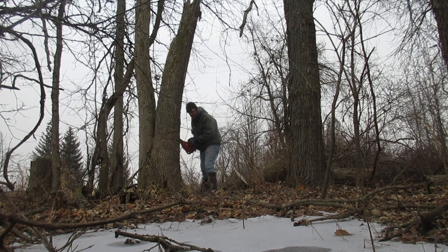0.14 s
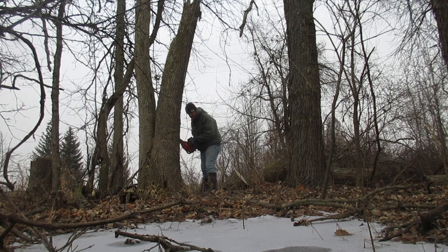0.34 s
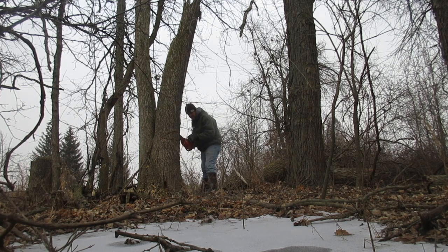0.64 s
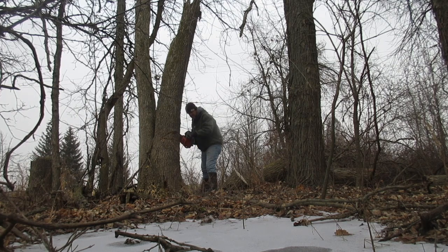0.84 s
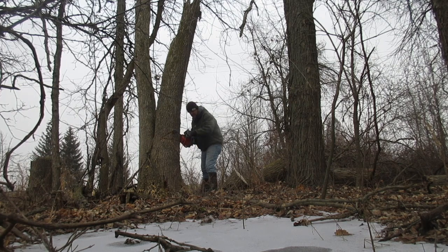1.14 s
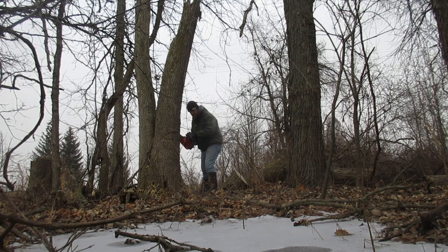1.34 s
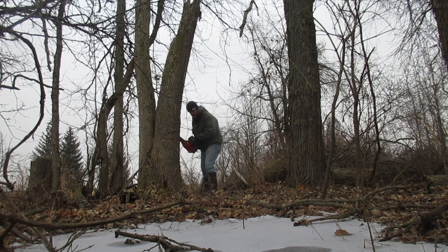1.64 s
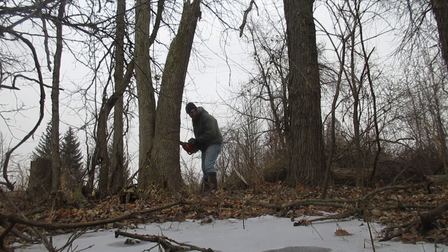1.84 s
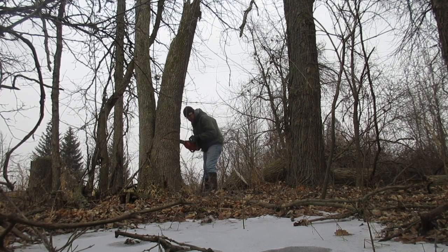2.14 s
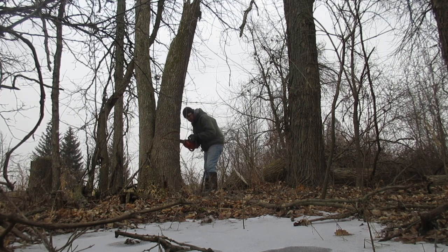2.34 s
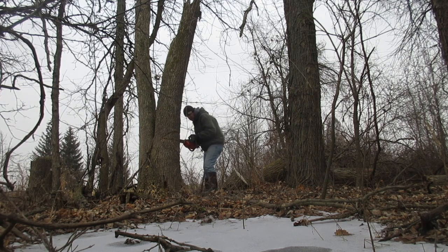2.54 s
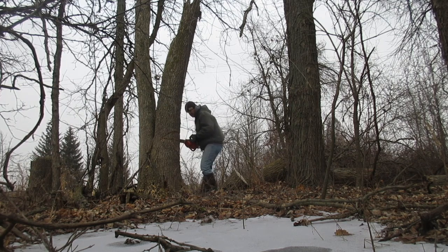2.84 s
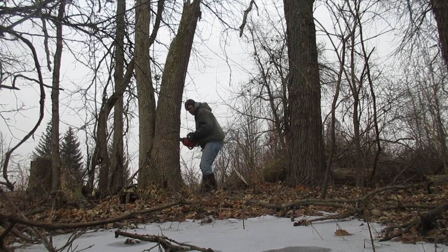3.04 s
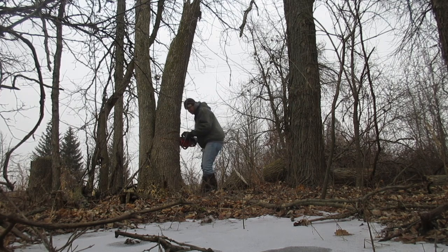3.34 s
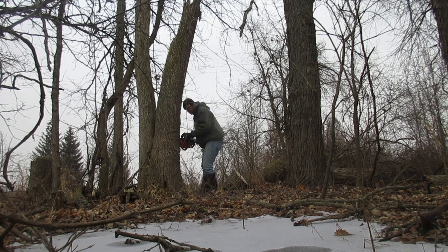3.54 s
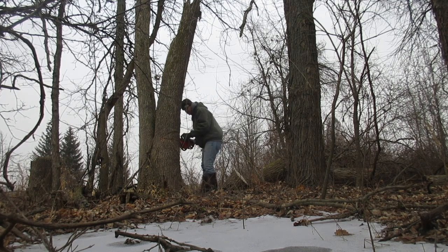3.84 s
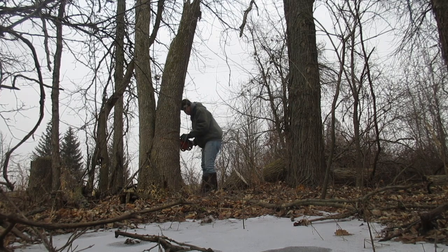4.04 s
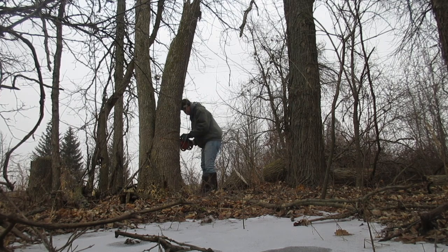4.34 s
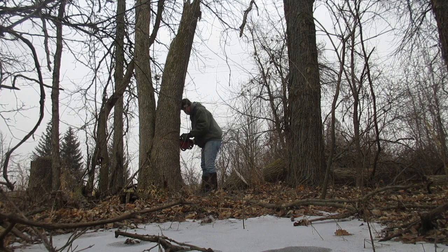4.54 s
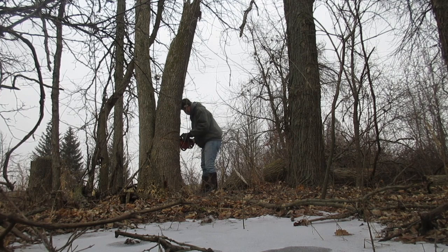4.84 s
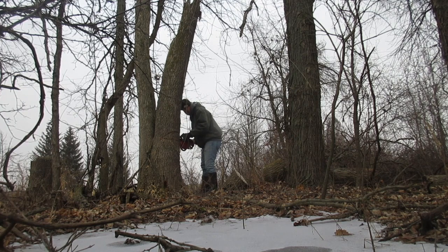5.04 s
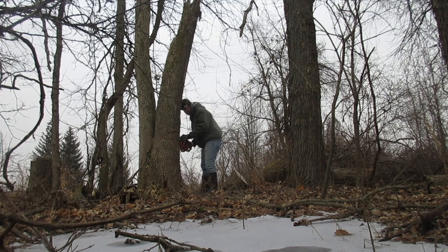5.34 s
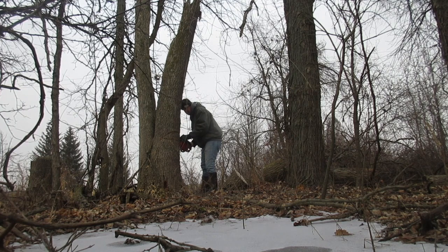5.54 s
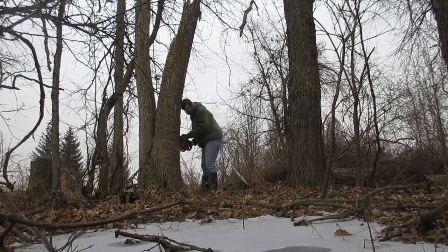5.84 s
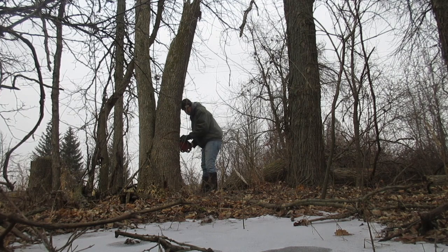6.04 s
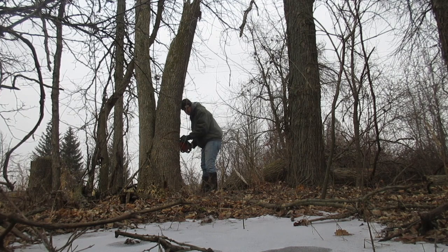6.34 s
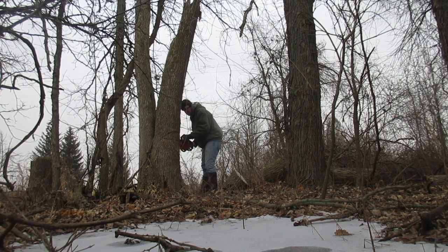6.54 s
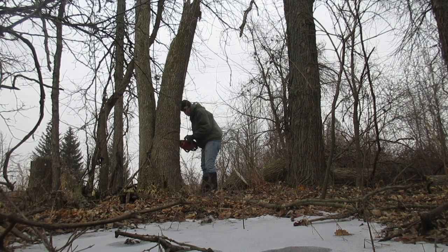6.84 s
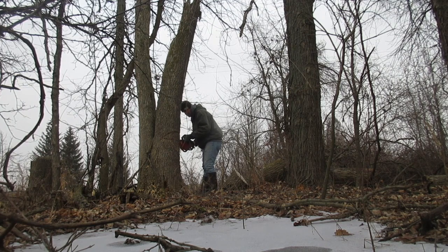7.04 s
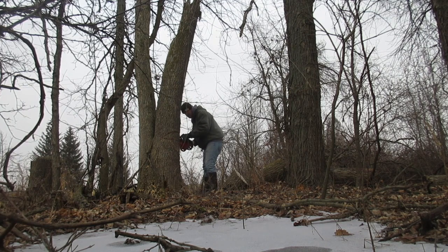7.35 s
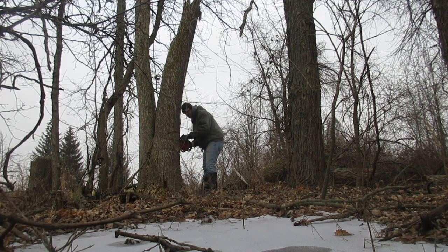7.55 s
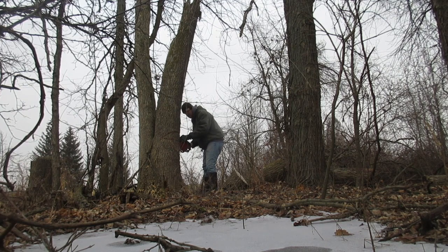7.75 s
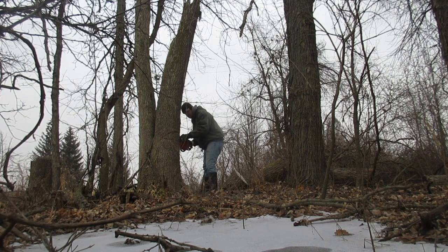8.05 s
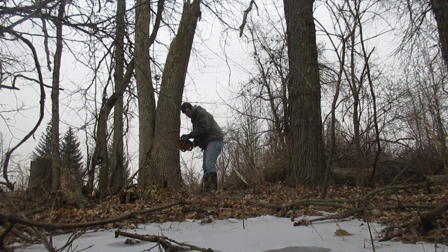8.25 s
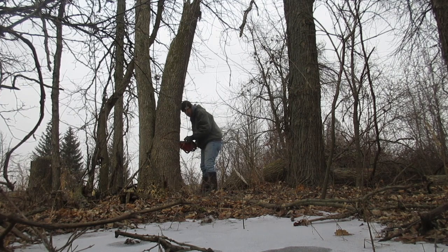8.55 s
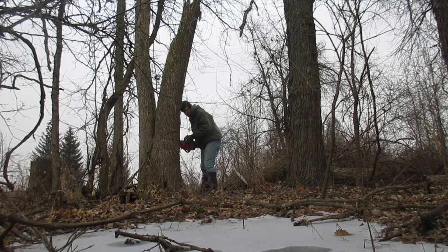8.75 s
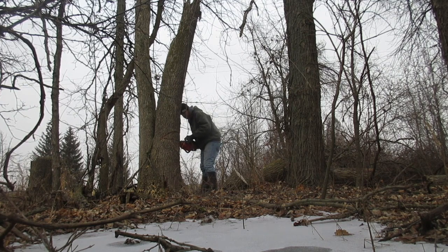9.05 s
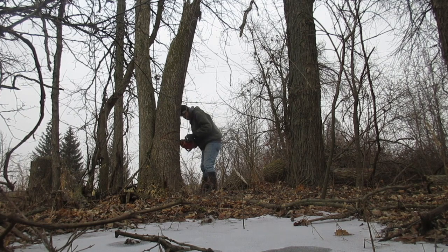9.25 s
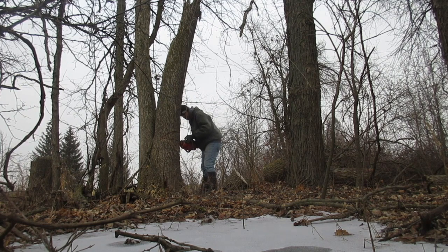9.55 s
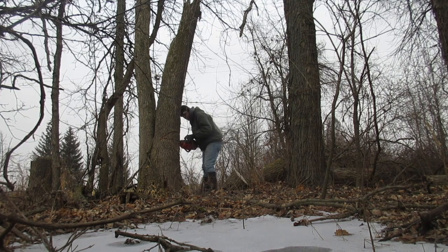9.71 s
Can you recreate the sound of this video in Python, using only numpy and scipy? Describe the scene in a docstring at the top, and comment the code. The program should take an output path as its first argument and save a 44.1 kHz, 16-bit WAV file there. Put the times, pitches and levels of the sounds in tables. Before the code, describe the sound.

A small battery chainsaw works on a tree trunk outdoors, heard in mono from some metres away, with faint tree echoes over soft, steady distant rumble and hiss. It is already running at 0 s and winds down by 0.3 s. Clacks lead into a short buzzing rev from 0.7 to 1.15 s. Leaves and bark rustle and tick until about 1.9 s, with a tiny squeak, then near quiet. Clacks at 2.9 s start a long cut from 3.0 to 5.85 s: raspy whine, sagging to a rough, low growl around 4.5-5.1 s, climbing again, then stopping. A faint squeak and light rustles follow at 6.1-6.7 s. Clacks start the last cut, 6.8-8.05 s, bright and steady with a brief dip, then slowing away. Rustling and ticks come at 8.3-8.7 s, a loud sharp twig snap at 8.8 s, faint ticks, and a weaker, duller snap near 9.6 s.

```python
"""Small chainsaw in a winter wood

A small battery chainsaw cuts a trunk in four bursts, some metres from a mono microphone.
Link blows in a pattern of four gate friction noise; beat, shaft and gears add tones. All slow as the chain bites.
Noise bursts make clacks, bites and idle-chain ticks on bark; leaves rustle and twigs snap in the pauses.
Tree echoes blur the near sounds over a faint steady background."""
import sys
import numpy as np
from scipy import signal
from scipy.fft import rfft, irfft, next_fast_len
from scipy.io import wavfile
from scipy.ndimage import uniform_filter1d, map_coordinates

SR = 44100
rng = np.random.default_rng(int(sys.argv[2]) if len(sys.argv) > 2 else 0)


def put_to_file(sound):
    """Save the sound as 16-bit audio at rate SR, in the file named by the first command-line argument."""
    columns = np.atleast_2d(sound).T  # one column per channel
    safe = np.clip(columns, -1, 1)
    whole_steps = np.round(safe * 32767)
    wavfile.write(sys.argv[1], SR, whole_steps.astype(np.int16))


N = 435708
TIME = np.arange(N) / SR
TOP_HZ = 15050  # band limit


def amp(db):
    """Amplitude ratio from dB."""
    return 10 ** (np.asarray(db) / 20)


def unit(x):
    """x at unit RMS."""
    return x / np.sqrt(np.mean(x ** 2) + 1e-20)


def along(points, hz):
    """Interpolates (f/Hz, value) points on a log frequency axis."""
    f, v = np.transpose(points)
    return np.interp(np.log(hz + 1), np.log(f + 1), v)


def curves(tables):
    """A gate open inside the tables, then one value per sample for each column."""
    s, *cols = np.concatenate(tables).T
    inside = sum((TIME >= t[0][0]) & (TIME <= t[-1][0]) for t in tables)
    gate = uniform_filter1d(inside * 1., size=600)
    return [gate] + [np.interp(TIME, s, c) for c in cols]


def wobble(rate_hz):
    """A smooth random curve with rate_hz knots a second."""
    coarse = TIME[::16]
    knots = rng.standard_normal(int(N * rate_hz / SR) + 4)
    return np.interp(TIME, coarse, map_coordinates(knots, [coarse * rate_hz]))


def spell(start_s, end_s, fade_s):
    """A gate that opens smoothly around start_s and shuts around end_s."""
    edge = np.minimum(TIME - start_s, end_s - TIME) / fade_s
    return np.clip(edge + .5, 0, 1) ** 2


def coloured(x, points):
    """Filters x with a minimum-phase response of unit power and the given spectrum."""
    response = amp(along(points, np.fft.rfftfreq(8192, 1 / SR)))
    cepstrum = irfft(np.log(np.maximum(response, 1e-4)))
    # fold to the causal side
    cepstrum[1:4096] *= 2
    cepstrum[4097:] = 0
    h = irfft(np.exp(rfft(cepstrum)))[:4096]
    return signal.fftconvolve(x, h / np.linalg.norm(h))[:len(x)]


# chips and cooling air; also treble of all contacts [f/Hz, density/dB]
HISS_SPECTRUM = [(2350, -31), (4000, -5), (4300, -9), (4850, -3), (6010, -5), (6240, 1), (6930, -4.5),
                 (7780, -2), (9020, -5.5), (9850, -7.5), (10800, -7), (13100, -12), (14900, -20)]


def three_bands(drive, low_db, high_db, low, middle):
    """One excitation per band, heard through a low, a middle and a treble colour."""
    treble = amp(high_db) * coloured(drive[2], HISS_SPECTRUM)
    return amp(low_db) * coloured(drive[0], low) + coloured(drive[1], middle) + treble


# four bursts, first already running, each slowing until it falls silent
# [t/s, cutter-pair rate f/Hz, chain level/dB]
DRIVE = [
    [(0, 299, -19.5), (.09, 298.6, -19.5), (.185, 172.4, -23.5), (.25, 120.7, -25.5), (.295, 66.7, -58)],
    [(.69, 72.9, -40), (.74, 120, -24.5), (.79, 155.5, -18), (.86, 262.3, -16), (.9, 295.5, -16.5),
     (.97, 282.6, -18.5), (1.04, 290.6, -19.5), (1.1, 232.3, -27.5), (1.14, 150.5, -36), (1.17, 90, -75)],
    [(2.96, 56.53, -34), (3.05, 127.9, -17.5), (3.14, 251.2, -16), (3.19, 267, -18), (3.283, 274.2, -18),
     (3.317, 297, -17), (3.46, 282.8, -18), (3.53, 299.6, -17.5), (3.68, 234.6, -20), (3.79, 224.5, -19.5),
     (3.87, 242.5, -18.5), (3.96, 239.8, -19.5), (4.1, 248, -18), (4.18, 195, -17.5), (4.235, 236.4, -18),
     (4.35, 255.2, -18.5), (4.43, 219.7, -15), (4.55, 133.5, -19.5), (4.61, 163, -18.5), (4.69, 177, -17.5),
     (4.765, 160.5, -20), (4.83, 114, -23), (4.88, 113.1, -20), (4.96, 139.2, -20.5), (5.044, 134.7, -18),
     (5.15, 199.5, -17.5), (5.263, 244, -16.5), (5.4, 248.7, -16), (5.453, 216.4, -16.5),
     (5.55, 261.8, -19.5), (5.67, 269, -17.5), (5.76, 215, -17), (5.81, 140.5, -24), (5.85, 100.1, -64)],
    [(6.82, 64, -33.5), (6.88, 110.2, -23), (6.92, 152.4, -15.5), (6.995, 250, -17), (7.03, 255.6, -16.5),
     (7.125, 264.8, -15.5), (7.17, 294, -16.5), (7.313, 285.6, -18), (7.36, 204, -19.5), (7.4, 199.1, -19),
     (7.46, 243.9, -19.5), (7.58, 271.7, -16), (7.78, 271.6, -17), (7.88, 251.4, -18.5),
     (7.95, 175.7, -19.5), (8.02, 135.3, -21), (8.04, 110, -41), (8.07, 75, -52)],
]
# mean blow of left cutter, tie, right cutter, tie [relative force]
LINKS = [0.58, 0.43, 0.27, 0.88]
# wood and housing [f/Hz, density/dB]
GROWL_SPECTRUM = [(88, -58), (150, -25.5), (301, -1.5), (425, -7), (553, -1.5), (687, -5), (900, -23.5),
                  (1170, -15), (1980, -120)]
# chain on bar [f/Hz, density/dB]
BAR_SPECTRUM = [(410, -20.5), (720, -20), (830, -3.5), (930, -9), (1170, -3.5), (1300, -7.5), (1590, -7.5),
                (1760, -7), (2300, -4), (2890, 2.5), (3200, -4.5), (3720, -4.5), (4090, -17), (4600, -14),
                (5980, -12), (10100, -120)]
# cutter beat, motor shaft (1.36), links [multiple of pair rate, relative level/dB]
CHAIN_TONES = [(1, -4), (1.36, -2), (2, -1), (3, -8), (8, -6)]
# tooth mesh and overtones [multiple of pair rate, relative level/dB]
GEAR_TONES = [(11, -12), (22, -18), (33, -13), (44, -19), (55, -30)]
# how well chain and gear tones carry [f/Hz, gain/dB]
SHELL_GAIN = [(150, -40), (225, -12), (310, 4), (400, -3), (520, 2), (900, 0), (1150, 5), (1500, -3),
              (2200, -8), (2950, 3), (4500, -13), (5600, -5), (6300, 3), (7100, -4), (8000, 1), (8900, 1),
              (9600, -9), (11500, -15), (15000, -14)]
# link beat ringing the bar [multiple of pair rate, relative level/dB]
LINK_TONES = [(4, -6), (6, -9), (9, -10), (10, -9), (12, -9)]
# bar response to that beat [f/Hz, gain/dB]
BAR_RING = [(600, -21), (760, -9), (920, -0.5), (1050, -1), (1180, 1.5), (1350, -10), (1620, -4.5),
            (1900, -27), (2500, 3), (2950, 0.5), (3500, -4)]
# how freely the bar rings, one entry per burst [gain/dB]
RING_DB = [2.5, 0.5, -1, 1]
# hiss re chain at the easy rate, one entry per burst [level/dB]
HISS_DB = [-2, -2.5, -5, -5.5]
FREE_HZ = 280  # pair rate of an easy cut
GROWL_DB, GROWL_DB_PER_HZ = -17, 0.0492  # re chain at the easy rate; gain as it slows
HISS_LOSS_DB_PER_HZ = 0.027  # loss as it slows
BOG_HZ, BOG_SPAN_HZ = 210, 80  # bogging starts below BOG_HZ, saturates over the span
STUMBLE_PER_HZ = .0002  # relative speed waver per Hz of bogging


def saw():
    """Link blows gate friction noise; steady parts of the beat and gear mesh sing as tones."""
    gate, pair_hz, chain_db = curves(DRIVE)
    slowed_hz = FREE_HZ - pair_hz
    growl_db = GROWL_DB + GROWL_DB_PER_HZ * slowed_hz
    burst = np.searchsorted([table[-1][0] + .1 for table in DRIVE[:-1]], TIME)
    hiss_db = np.take(HISS_DB, burst) - HISS_LOSS_DB_PER_HZ * slowed_hz

    # rotor inertia rounds the speed changes; the load shakes it
    pair_hz = uniform_filter1d(pair_hz, size=1200) * (1 + .007 * wobble(25) + .004 * wobble(200))
    stumble = STUMBLE_PER_HZ * np.clip(BOG_HZ - pair_hz, 0, BOG_SPAN_HZ)
    pair_hz = pair_hz * (1 + stumble * wobble(30))
    turn = np.cumsum(pair_hz) / SR

    # each link strikes with its own force, then decays until the next
    link_phase = len(LINKS) * turn
    link = np.floor(link_phase).astype(int)
    force = np.take(LINKS, link, mode="wrap") * amp(2.6 * rng.standard_normal(link[-1] + 1))[link]
    beat = 1.23 + force * np.exp(-2.5 * (link_phase - link))

    # uneven wood grain: lumps shared by the bands, plus each band's own
    lumps_db = .4 * wobble(9) + 1.1 * wobble(70)
    drive = [unit(beat * amp(lumps_db + own_db * wobble(30)) * rng.standard_normal(N))
             for own_db in (1.5, 1.1, .7)]
    noise = three_bands(drive, growl_db - 6, hiss_db - .5, GROWL_SPECTRUM, BAR_SPECTRUM)
    noise = amp(chain_db - .6) * noise
    # no bass below 200 Hz in the friction noise
    noise = signal.sosfilt(signal.butter(4, 200, "high", fs=SR, output="sos"), noise)

    # speeding up or braking smears the tones
    slope_hz_per_s = np.abs(np.gradient(uniform_filter1d(pair_hz, size=2000))) * SR
    even_db = -np.minimum(.005 * slope_hz_per_s, 12)
    mesh_db = 3 * wobble(12) + 3 * wobble(160)  # tooth contact flickers with the load
    # a bogged chain loses its beat and loads the gears harder
    bog_db = -.05 * np.clip(BOG_HZ - pair_hz, 0, BOG_SPAN_HZ)

    def tone(k, db):
        level = amp(db + 2.6 * wobble(22))
        return level * np.sin(2 * np.pi * (k * turn + rng.random())) * (k * pair_hz < TOP_HZ)

    def carried(table, db):
        return sum(tone(k, db + level_db + even_db + along(SHELL_GAIN, k * pair_hz))
                   for k, level_db in table)

    ring_db = chain_db + np.take(RING_DB, burst) + 0.3 * even_db
    ring = sum(tone(k, ring_db + db + along(BAR_RING, k * pair_hz)) for k, db in LINK_TONES)
    # the lowest mesh tone drowns when bogged
    low_mesh = carried(GEAR_TONES[:1], chain_db + mesh_db + 3 * bog_db)
    chain = carried(CHAIN_TONES, chain_db + growl_db + 1.24 * bog_db)
    # overtones keep about a third of the smearing loss
    high_mesh = carried(GEAR_TONES[1:], chain_db - 0.68 * even_db + mesh_db - bog_db)
    return gate * (noise + ring + low_mesh + chain + high_mesh)


# bar shaking the trunk as the chain slows under load [t/s, half length/s, level/dB]
JUDDER = [(4.52, .08, -46), (4.96, 0.12, -39.5), (7.37, .04, -44)]
# trunk thud [f/Hz, density/dB]
THUD_SPECTRUM = [(30, -38), (60, -4), (110, -2), (150, -4), (250, -39)]


def judder():
    """The bar shakes the trunk as the chain slows under load: lumpy low noise."""
    level = sum(amp(db) * np.exp(-((TIME - s) / half_s) ** 2) for s, half_s, db in JUDDER)
    lumpy = unit(amp(1.8 * wobble(44)) * rng.standard_normal(N))
    return level * coloured(lumpy, THUD_SPECTRUM)


# housing knock [f/Hz, density/dB]
KNOCK_SPECTRUM = [(150, -48), (300, -4.5), (430, -17), (560, -1.5), (690, -19), (850, -3.5), (1000, -8),
                  (1180, -2.5), (1350, -6.5), (2200, -44)]
# light contacts [f/Hz, density/dB]
SCRAPE_SPECTRUM = [(900, -45), (1800, -8), (2400, -0.5), (2900, 3), (3500, -4.5), (4200, -11.5),
                   (6000, -33)]
BLOW_RISE_S = 0.00067  # time constant


def blows(table):
    """Contact bursts rise fast and die, each with its own knock and treble; the knock lasts longest."""
    drive, t = np.zeros((3, N + SR)), np.arange(SR // 4) / SR
    for s, db, knock_db, treble_db, t60_s in table:
        band_t60_s = np.clip([[2 * t60_s], [t60_s], [t60_s]], .002, .2)
        burst = amp(-60 * t / band_t60_s) * rng.standard_normal((3, len(t)))
        burst *= 1 - np.exp(-t / BLOW_RISE_S)
        band_db = db + np.array([[knock_db], [1.5], [treble_db]])
        drive[:, round(s * SR):][:, :len(t)] += amp(band_db) * burst
    return three_bands(drive[:, :N], 0.34, -0.68, KNOCK_SPECTRUM, SCRAPE_SPECTRUM)


# drive taking up slack, and the brake; the row at 3.024 s is a cutter grabbing the wood [t/s, relative
# level/dB, knock re level/dB]
CLACKS = [(0.596, -23, -4.5), (0.6092, -25.5, -18), (0.662, -24.5, -17), (0.671, -17.5, -7),
          (1.1409, -27.5, -4), (2.9075, -26, -6.5), (2.9379, -24, -21), (2.9505, -22.5, -4),
          (3.024, -12, -26), (6.7331, -21, -10.5), (6.8009, -20.5, -3.5)]
CLACK_TREBLE_DB, CLACK_T60_S = -12, 0.038  # treble re level


def clacks():
    """Blow list: the drive takes up slack or the brake grips; one entry is a cutter grabbing the wood."""
    return [(s, db, knock_db, CLACK_TREBLE_DB, CLACK_T60_S) for s, db, knock_db in CLACKS]


# cutters grabbing the wood [t/s, relative level/dB]
BITES = [(0.744, -16.5), (0.774, -19), (0.919, -16.5), (3.371, -10), (3.55, -12.5), (6.929, -22)]


def bites():
    """Blow list: cutters grab the wood, heavy in knock and weak in treble."""
    return [(s, db - 11, 9, -8, .03) for s, db in BITES]


# a link rubbing the bar [t/s, half length/s, centre f/Hz, mean level/dB]
SQUEAKS = [(1.945, 0.0089, 2820, -45.5), (6.13, 0.039, 2920, -49)]


def squeaks():
    """A link rubs the bar: short whistles, unsteady in level and pitch."""
    out = 0
    for s, half_s, centre_hz, db in SQUEAKS:
        level = amp(db + 5.04 * wobble(230)) * np.exp(-((TIME - s) / half_s) ** 4)
        hz = centre_hz * (1 + 0.046 * wobble(45) + 0.05003 * wobble(400))
        out = out + level * np.sin(2 * np.pi * np.cumsum(hz) / SR)
    return out


# twigs snapping [t/s, relative level/dB, splinter tail re level/dB]
SNAPS = [(8.817, -3.5, -21), (9.59, -20, -9)]
# first twig [f/Hz, density/dB]
THIN_TWIG = [(120, -51), (200, -19), (1280, -19), (2540, -4), (3390, -2), (4870, -15), (5930, -6.5),
             (6730, -17), (9650, -16.5), (14900, -39)]
# second twig [f/Hz, density/dB]
THICK_TWIG = [(120, -43), (200, -13), (926, -2), (1070, -8), (3710, -16), (5140, -26), (11200, -28),
              (14900, -44.5)]


def snaps():
    """A twig breaks sharply within milliseconds, then a noise tail of splinters fades."""
    out, t = np.zeros(N + SR), np.arange(SR // 4) / SR
    for (s, db, tail_db), wood in zip(SNAPS, (THIN_TWIG, THICK_TWIG)):
        decay = amp(-60 * t / 0.016) + amp(tail_db - 60 * t / 0.15)
        burst = decay * rng.standard_normal(len(t))
        burst[:3] = [1, 3, 4]  # same onset for each snap
        out[round(s * SR):][:len(t)] += amp(db - 8) * coloured(burst, wood)
    return out[:N]


# rustling in the pauses [start t/s, end t/s, scrape level/dB, knock re scrape/dB,
# treble of each spell re the shared treble level/dB]
RUSTLE = [(1.2, 1.902, -55, 0.5, -8), (6.075, 6.288, -55, -1, -2), (6.586, 6.723, -55, -2, 6),
          (8.313, 8.702, -52, -3, -4.5), (9.324, 9.51, -67, 0, -4)]
RUSTLE_FADE_S, RUSTLE_TREBLE_DB = 0.073, -5.0  # treble shared by all spells


def rustle():
    """Leaves, bark and cloth crackle as the sawyer shifts: noise with a fast random level."""
    levels = sum(amp([[db + knock_db], [db], [db + treble_db]]) * spell(start_s, end_s, RUSTLE_FADE_S)
                 for start_s, end_s, db, knock_db, treble_db in RUSTLE)
    crackle = [level * unit(amp(3.3 * wobble(150)) * rng.standard_normal(N)) for level in levels]
    return three_bands(crackle, 0, RUSTLE_TREBLE_DB, KNOCK_SPECTRUM, SCRAPE_SPECTRUM)


SMALL_TICKS_PER_S = 35
SMALL_TICK_DB, SMALL_TICK_SPREAD_DB = 10.5, 4.5  # re scrape; plus or minus
SMALL_TICK_TREBLE_DB = -12  # re tick


def small_ticks():
    """Weak ticks scattered at random through the rustling."""
    ticks = []
    for start_s, end_s, db, *_ in RUSTLE:
        for u, g in rng.random((int(SMALL_TICKS_PER_S * (end_s - start_s)), 2)):
            tick_db = db + SMALL_TICK_DB + SMALL_TICK_SPREAD_DB * (2 * g - 1)
            ticks.append((start_s + u * (end_s - start_s), tick_db, SMALL_TICK_TREBLE_DB))
    return ticks


# loudest contacts on bark, twigs, leaves [t/s, relative level/dB, treble re level/dB]
TICKS = [(1.265, -41, -9), (1.2955, -35, -2), (1.318, -33, -2), (1.4038, -33.5, -11), (1.4313, -36, 7),
         (1.5747, -34.5, -12), (1.594, -32, -15), (1.6428, -27.5, -4), (1.717, -36.5, -3),
         (1.7937, -33, -8), (2.5628, -38.5, -5), (6.2078, -44, -18), (6.238, -38, -18), (6.2637, -39, -25),
         (6.275, -31.5, -26), (6.6313, -33, -15), (6.7112, -34, -16), (6.7859, -31, -8), (8.309, -37, -23),
         (8.33, -34, -25), (8.347, -33.5, -20), (8.362, -38, -25), (8.413, -39, -20), (8.4456, -38, 3),
         (8.503, -31, -24), (8.5213, -31, -26), (8.612, -32, -9), (8.6385, -34, -21), (8.971, -39, -9),
         (9.3394, -43, -15), (9.3948, -39, -18), (9.408, -35, -5), (9.4986, -41, -19)]
TICK_T60_S = .016
TICK_KNOCK_DB, KNOCK_PER_TREBLE = -2.5, 0.44  # knock re level; dB per dB of treble


def ticks():
    """Blow list: chain on bark, twigs, leaves; harder, brighter ticks knock the housing more."""
    return [(s, db, TICK_KNOCK_DB + KNOCK_PER_TREBLE * treble_db, treble_db, TICK_T60_S)
            for s, db, treble_db in TICKS + small_ticks()]


# echo decay [f/Hz, t60/s]
TREES = [(200, 0.51), (2000, 0.26), (10000, 0.17)]


def trees(x):
    """Trunks scatter echoes: x convolved with decaying noise, treble dying first."""
    hz, t, z = signal.stft(rng.standard_normal(SR // 2), SR, nperseg=256)
    decay = amp(-60 * t / along(TREES, hz)[:, None])
    tail = signal.istft(z * decay, SR, nperseg=256)[1]
    delayed = np.pad(x, (150, 0))  # samples
    return signal.fftconvolve(delayed, tail / np.linalg.norm(tail))[:N]


# far traffic and self noise [f/Hz, density/dB]
AIR_SPECTRUM = [(16, -30), (28, -10), (76, 3.5), (248, -4), (387, -7.5), (766, -7), (1080, -8.5),
                (1290, -6.5), (2130, -15.5), (2770, -14.5), (4330, -19), (8800, -22), (14900, -31.5)]
AIR_DB = -51.5  # mean


def air():
    """Far traffic and self noise: steady coloured noise, wavering a little."""
    waver_db = .7 * wobble(4)
    return amp(AIR_DB + waver_db) * coloured(rng.standard_normal(N), AIR_SPECTRUM)


def scene():
    """Near sources with tree echoes, plus dry snaps and air; same signal on both channels."""
    contacts = clacks() + ticks() + bites()
    near = saw() + judder() + blows(contacts) + rustle() + squeaks()
    mono = near + amp(-13.5) * trees(near) + snaps() + air()
    return np.array([mono, mono])


def record(dry):
    """The input stage rounds off the highest peaks; nothing is kept above the band limit."""
    soft = dry / (1 + np.abs(dry / .95) ** 4) ** (1 / 4)
    m = next_fast_len(N + SR)
    passed = np.fft.rfftfreq(m, 1 / SR) < TOP_HZ
    return irfft(rfft(soft, m) * passed, m)[:, :N]


dry = scene()
out = record(dry)
put_to_file(out)
```